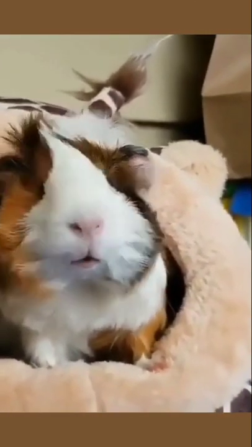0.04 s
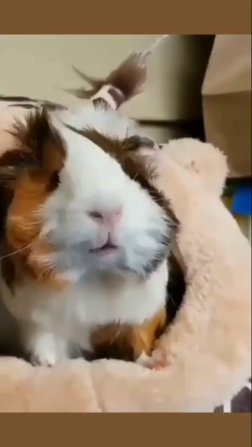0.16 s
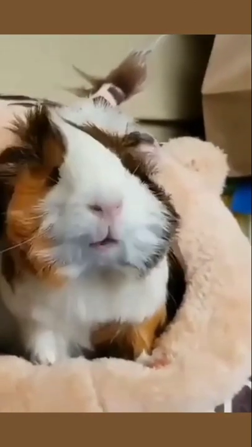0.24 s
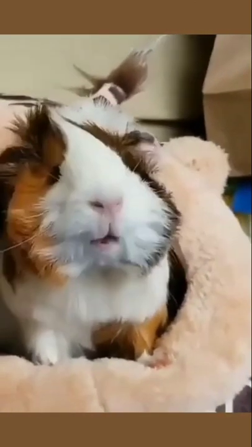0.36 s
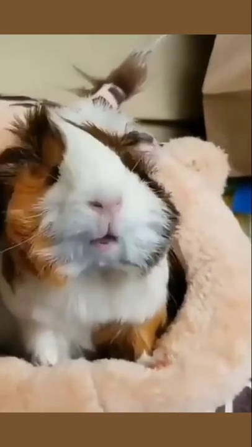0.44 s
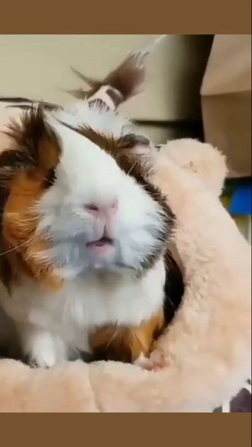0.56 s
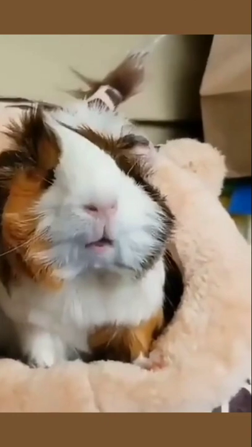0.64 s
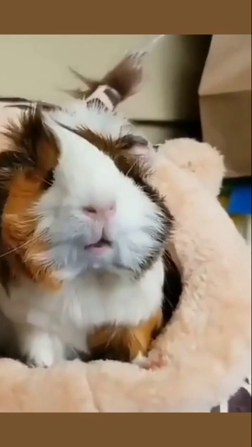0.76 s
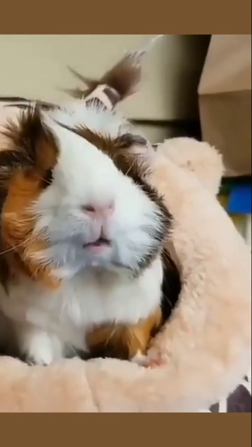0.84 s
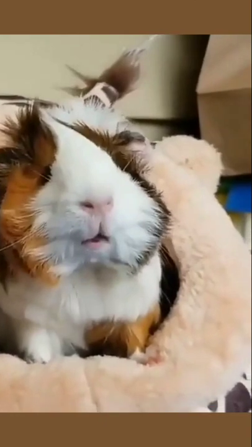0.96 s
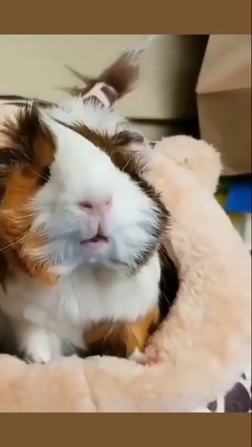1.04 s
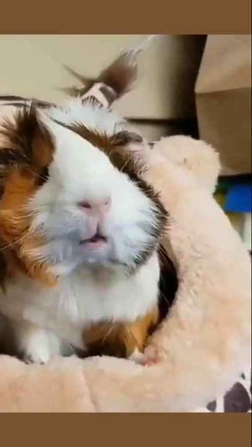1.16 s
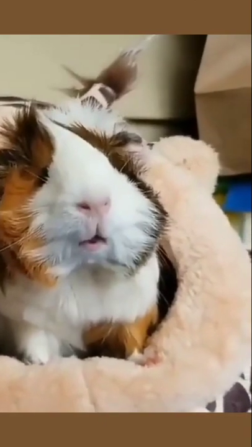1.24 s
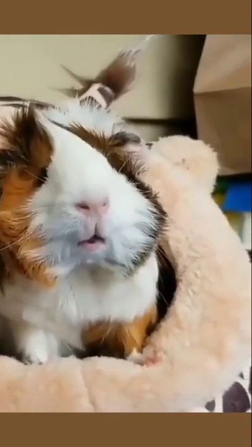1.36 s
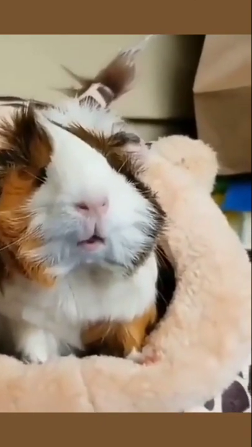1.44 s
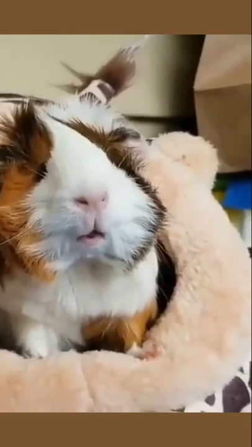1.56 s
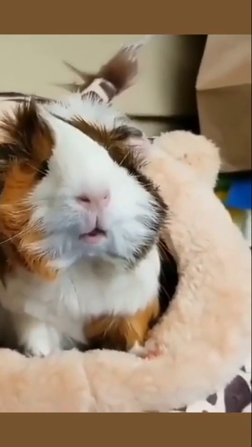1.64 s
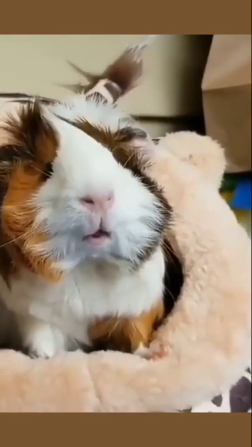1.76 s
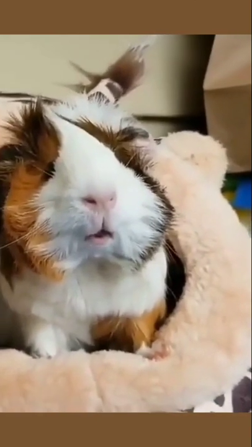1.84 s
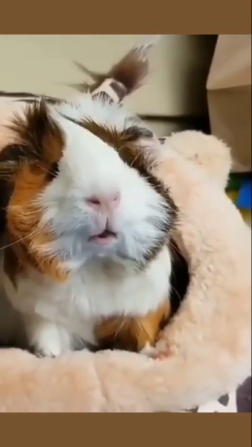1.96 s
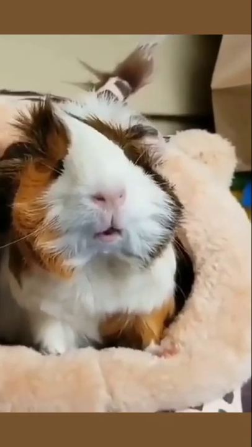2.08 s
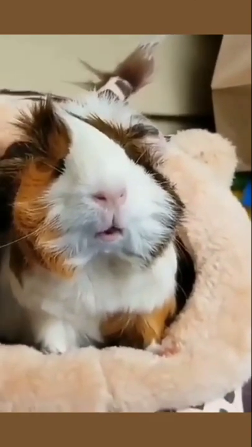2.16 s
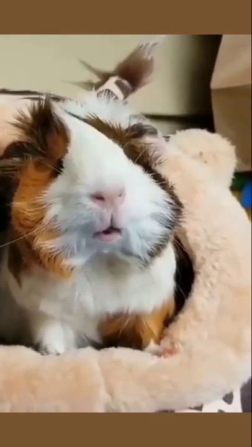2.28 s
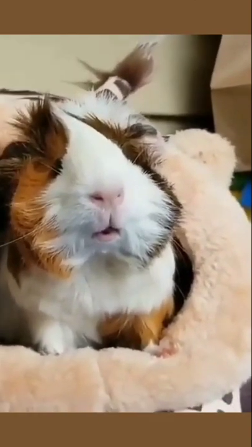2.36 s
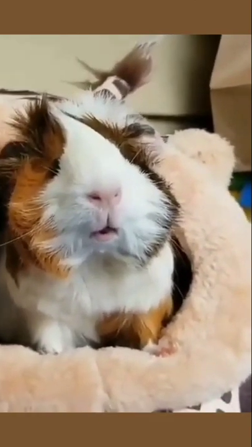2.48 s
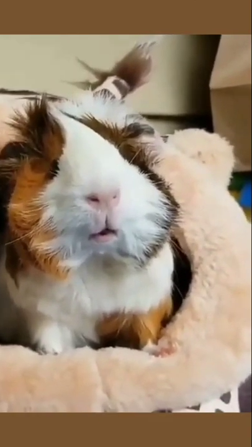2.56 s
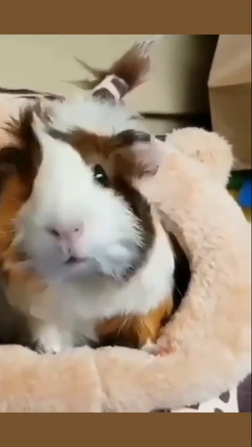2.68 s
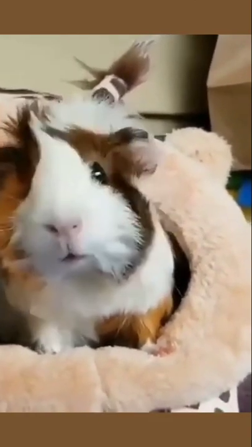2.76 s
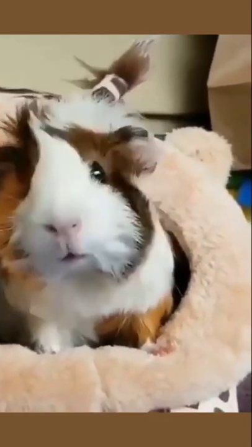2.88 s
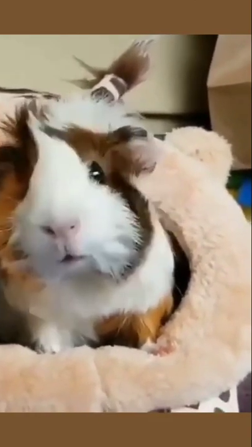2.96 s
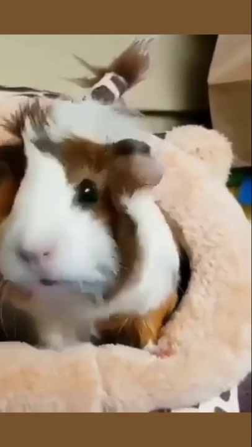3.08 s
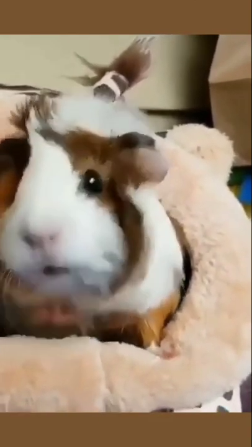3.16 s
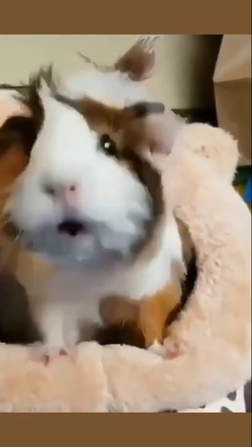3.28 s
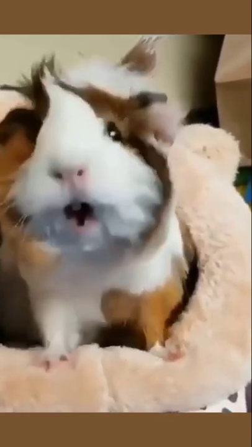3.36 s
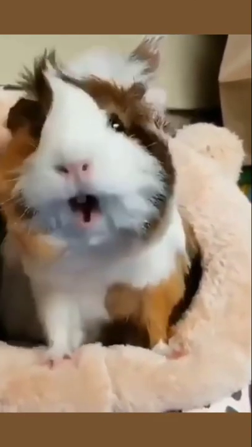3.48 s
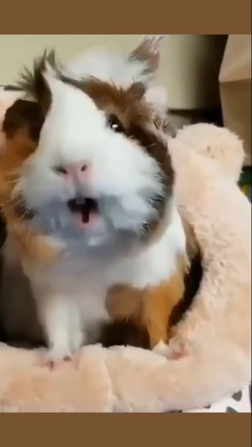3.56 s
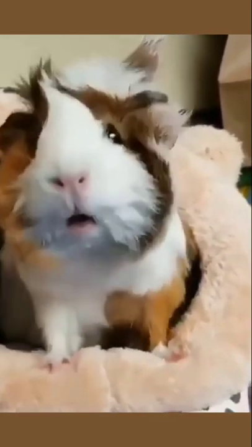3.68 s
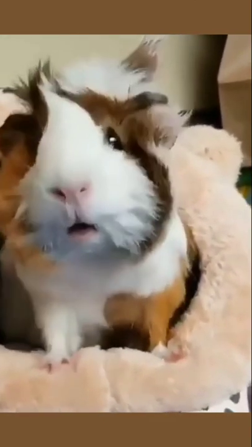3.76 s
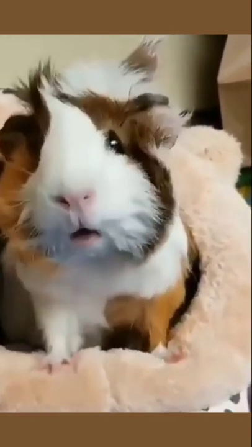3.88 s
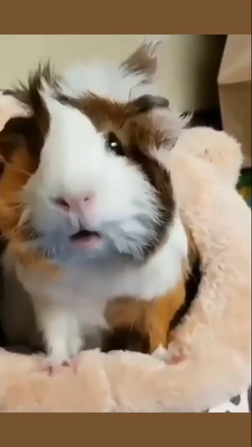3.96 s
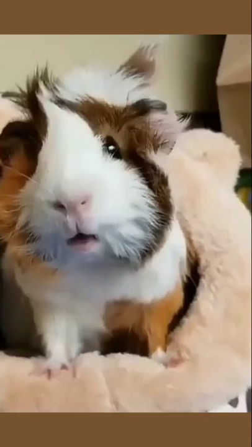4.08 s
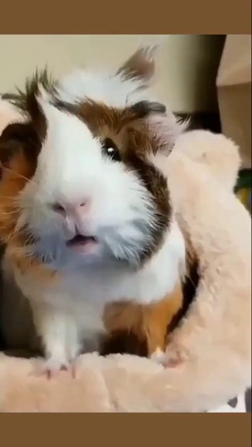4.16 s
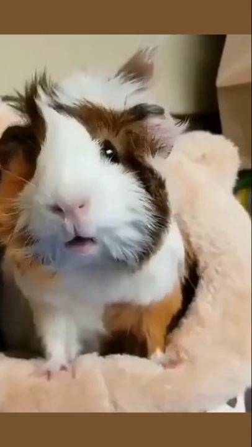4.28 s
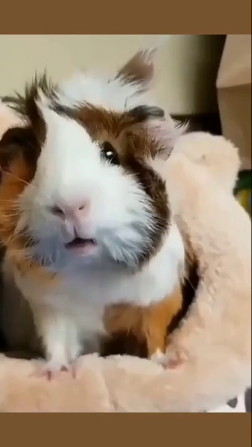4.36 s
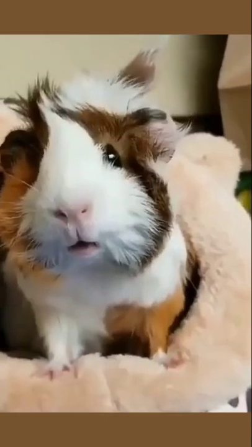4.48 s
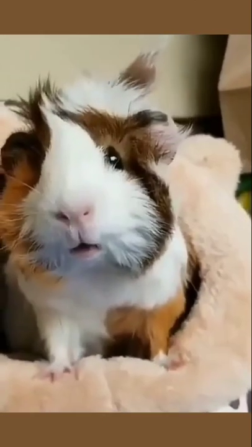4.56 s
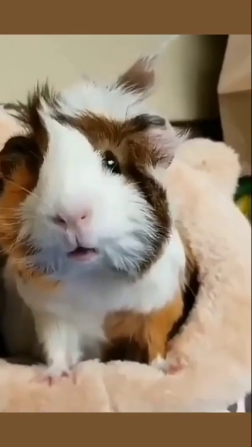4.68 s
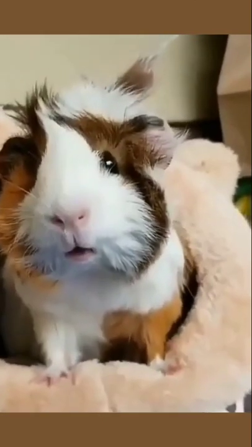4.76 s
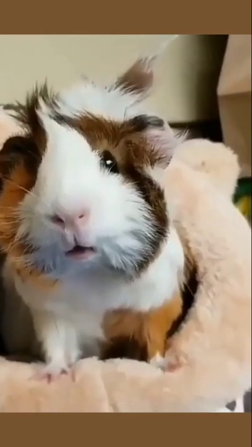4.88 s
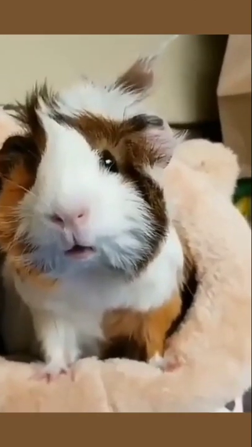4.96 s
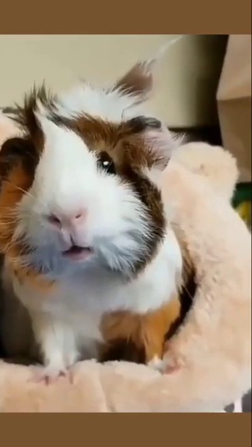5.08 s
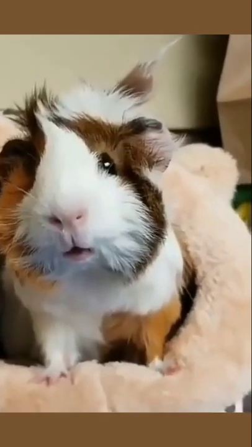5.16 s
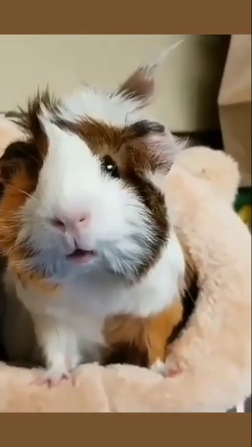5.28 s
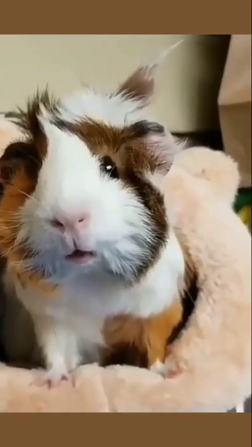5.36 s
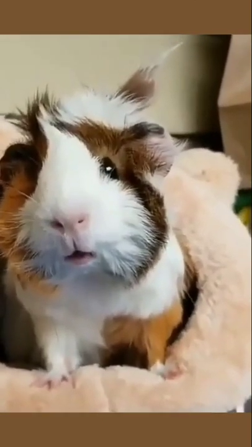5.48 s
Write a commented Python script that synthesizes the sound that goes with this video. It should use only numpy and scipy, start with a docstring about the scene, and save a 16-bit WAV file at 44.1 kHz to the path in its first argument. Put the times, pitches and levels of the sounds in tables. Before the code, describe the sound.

Close phone microphone in a small, fairly dry room. A guinea pig in a fleece bed makes soft, low whimpers that glide up, with tiny peeps and mouth ticks between. Just past the middle one call swells into a piercing, very loud rising whistle; the next stretches into a moderate long squeal. Two quieter whimpers and a soft padded bump end it, over low room noise and faint fur rustle.

```python
"""A small room, a phone microphone close to a fleece bed where a guinea pig calls nine times.
Low room noise and grainy fur rustle, both shaped noise, come first, then ticks of banded noise and short peeps.
Each call is a harmonic stack that starts as a low whimper and glides up; the first breaks into a squeak, the second
whines on, the sixth swells into a piercing whistle, the seventh into a long squeal.
The voice sometimes repeats every second or third cycle; soft bumps, damped low tones, come near the end."""
import sys
import numpy as np
from scipy import signal
from scipy.fft import rfft, irfft
from scipy.io import wavfile
from scipy.ndimage import uniform_filter1d

SR = 44100
rng = np.random.default_rng(int(sys.argv[2]) if len(sys.argv) > 2 else 0)


def transcribe(signal):
    """Save signal, clipped to [-1, 1], as a 16-bit WAV file at the path in sys.argv[1]."""
    frames = np.atleast_2d(signal).T
    limited = np.clip(frames, -1, 1)
    pcm = np.round(limited * 32767).astype(np.int16)
    wavfile.write(sys.argv[1], SR, pcm)


N = 243431
TIME = np.arange(N) / SR


def undb(db):
    """Decibels to gain."""
    return 10 ** (np.asarray(db) / 20)


def unit(x):
    """Scale to rms 1."""
    return x / np.sqrt(np.mean(x ** 2) + 1e-20)


def colour(hz, points):
    """Gain at given frequencies, read from (hz, level_db) points on a log frequency axis."""
    point_hz, level_db = np.transpose(points)
    return undb(np.interp(np.log(hz + 1), np.log(point_hz), level_db))


def noise(points):
    """Steady noise with a given spectrum."""
    size = 2 ** 18
    spectrum = rfft(rng.standard_normal(size)) * colour(np.fft.rfftfreq(size, 1 / SR), points)
    return unit(irfft(spectrum)[:N])


def walk(t, rate):
    """Random wander of spread 1 through a new value rate times a second."""
    place = (t - t[0]) * rate
    return unit(np.interp(place, np.arange(16384), rng.standard_normal(16384)))


def gate(t, start, end, edge):
    """Smooth opening between two times, half open at each of them."""
    opening = np.minimum(t - start, end - t) / edge + .5
    return np.sin(np.pi / 2 * np.clip(opening, 0, 1)) ** 2


# spectrum of the low room noise: hz, level_db
ROOM_SPECTRUM = [(12, -59), (20, -14.5), (119, 0), (386, -8.5), (494, -12), (787, -13.5), (879, -15.5),
                 (1290, -14.5), (1840, -20.5), (4550, -27.5), (7250, -31), (9030, -46.5), (11900, -31),
                 (14000, -42.5)]
# how loud the room noise stands, before its gain: time_s, level_db
ROOM_NOISE_LEVEL = [(0.0, -46), (1.8, -48.5), (2.12, -46), (2.91, -47.5), (3.44, -47), (3.61, -54.5),
                    (4.61, -52.5), (4.98, -49.5), (5.52, -48.5)]


def room_noise(gain_db=1, waver_db=1):
    """A low, slightly wavering background of shaped noise."""
    s, db = np.transpose(ROOM_NOISE_LEVEL)
    level_db = np.interp(TIME, s, db) + gain_db + waver_db * walk(TIME, 19)
    return noise(ROOM_SPECTRUM) * undb(level_db)


# each shift of the body rubs fur on the bedding, level before the gain: start_s, end_s, level_db
RUBS = [(-.03, .08, -52.5), (0.14, .48, -55), (0.646, .96, -58), (1.058, 1.32, -55.5), (1.628, 1.82, -56.5),
        (1.871, 2.28, -52), (2.306, 2.53, -49.5), (2.608, 3.0, -50), (3.022, 3.97, -58), (4.64, 4.85, -65),
        (4.99, 5.09, -55.5), (5.174, 5.6, -61.5)]
# spectrum of fur on fleece: hz, level_db
RUB_SPECTRUM = [(240, -28), (400, -2.5), (907, -6.5), (977, -12.5), (1070, -7), (1670, -16), (2280, -1),
                (3260, -7), (7060, -6), (8830, -16), (12200, -8.5), (13400, -23), (14000, -50.5)]
RUB_EDGE_S, RUB_TREND_DB = 0.11, -0.5  # fade in and out; change of level from start to end
STILL_DB = -79  # fur at rest, before the gain


def bedding(gain_db=4.0, grain_db=2.0):
    """Hairs slip over fleece: a fine, grainy hiss that rises with each shift of the animal."""
    rubs = np.zeros(N)
    for start, end, db in RUBS:
        progress = np.clip((TIME - start) / (end - start), 0, 1)
        rubs += gate(TIME, start, end, RUB_EDGE_S) * undb(db + RUB_TREND_DB * (progress - .5))
    grain = undb(gain_db + grain_db * walk(TIME, 660))
    return noise(RUB_SPECTRUM) * np.hypot(rubs, undb(STILL_DB)) * grain


# ticks and scuffs of mouth and claws, level before gain and decay:
# start_s, level_db, centre_hz, width_hz, decay_s
TICK_BURSTS = [(0.03, -32.5, 1960, 1820, 0.0025), (0.032, -43.5, 12400, 4000, 0.0053),
               (0.203, -29.5, 6760, 2000, 0.0013), (2.45, -42, 5140, 6060, 0.053),
               (3.213, -36.5, 6300, 2000, 0.0075), (3.213, -41.5, 11200, 3000, 0.0073),
               (3.713, -32.5, 2390, 460, 0.008), (3.715, -28.5, 6070, 890, 0.0058),
               (3.708, -28.5, 12140, 496, 0.012), (3.857, -50.5, 1480, 1800, 0.099),
               (4.216, -45.5, 1260, 398, 0.02), (5.006, -44.5, 5500, 6000, 0.022),
               (5.013, -46, 11860, 2530, 0.019), (5.299, -50, 6220, 702, .015)]


def ticks(gain=1.4):
    """Short, damped bursts of noise, each in its own resonant band."""
    out = np.zeros(N)
    t = TIME[:SR // 4]
    f = np.fft.rfftfreq(len(t), 1 / SR)
    for s, db, hz, width, decay in TICK_BURSTS:
        band = 1 / (1 + (2 * (f - hz) / width) ** 2)
        burst = unit(irfft(rfft(rng.standard_normal(len(t))) * band, len(t)))
        # a narrow resonance takes longer to build up
        burst = burst * undb(db) * np.exp(-t / decay) * (1 - np.exp(-t * width))
        i = int(s * SR)
        out[i:i + len(t)] += gain * burst[:N - i]
    return out


# echoes from surfaces near the bed: delay_s, level_db
NEAR_SURFACES = [(.0021, -26), (.0051, -30), (.0094, -30), (.0147, -32)]


def room(x, t60_s=0.39, tail_db=-27):
    """Near surfaces beat against the glides; soft furnishings leave only a short tail."""
    t = TIME[:SR // 2]
    tail = rng.standard_normal(len(t)) * np.exp(-np.log(1000) * t / t60_s) * (t > .004)
    response = undb(tail_db) * tail / np.linalg.norm(tail)
    for delay, db in NEAR_SURFACES:
        response[int(delay * SR)] += undb(db)
    return x + signal.fftconvolve(x, response)[:N]


ARCH_DB = 3.5  # a peep is this much weaker at its ends than in its middle


def peep(start, end, from_hz, to_hz, *levels_db):
    """A straight glide that swells and fades, as rows of (s, pitch, three harmonic levels)."""
    u = np.linspace(0, 1, 21)
    arch = ARCH_DB * (2 * u - 1) ** 2
    glide = [start + (end - start) * u, from_hz + (to_hz - from_hz) * u]
    return np.column_stack(glide + [db - arch for db in levels_db])


HOLD_S = .02  # length of the low note
SCOOP_HZ, SCOOP_S = 48, .01  # the voice starts this much sharp and settles
ATTACK_DB, ATTACK_S = 4, 0.0043  # the low note starts this much weaker and swells briefly
FADE_S = 0.018  # length of the fade that ends a soft call
LOW_DULL_DB = 3  # the low note has weaker upper harmonics than the top of the glide


def whimper(start, end, glide, low_hz, top_hz, end_hz,
            low_db, low_second_db, first_db, second_db, upper_db, fade_db=0):
    """A low note, an S-shaped glide and a slow drift, as rows of (s, pitch, three harmonic levels)."""
    t = np.arange(start, end, .001)
    top = start + HOLD_S + glide
    rise = np.sin(np.pi / 2 * np.clip((t - start - HOLD_S) / glide, 0, 1)) ** 2
    drift = np.maximum(t - top, 0) / max(end - top, glide / 2)
    scoop = SCOOP_HZ * np.exp((start - t) / SCOOP_S)
    hz = low_hz + scoop + (top_hz - low_hz) * rise + (end_hz - top_hz) * drift
    attack = ATTACK_DB * np.exp((start - t) / ATTACK_S)
    fade = attack + fade_db * np.clip(1 - (end - t) / FADE_S, 0, 1)
    first = low_db + (first_db - low_db) * rise
    second = low_second_db + (second_db - low_second_db) * rise
    upper = upper_db - LOW_DULL_DB * (1 - rise)
    return np.column_stack([t, hz, first - fade, second - fade, upper - fade])


# hoarse stretches: start_s, end_s, roughness (0-1)
HOARSE_STRETCHES = [(0.189, .37, 0.17), (0.511, 0.517, 0.2), (0.724, 0.834, 0.6), (1.473, 1.52, 0.6),
                    (1.654, 1.79, 0.33), (1.959, 1.99, 0.7), (2.457, 2.506, 0.37), (3.308, 3.357, 0.15),
                    (3.457, 3.483, 0.08), (3.532, 3.596, 0.31), (3.697, 3.77, 0.29), (3.855, 3.973, 0.22),
                    (4.463, 4.514, 0.33), (5.09, 5.23, 0.23)]
# period doubling or tripling, which puts lines between the harmonics:
# start_s, end_s, level_db, centre_hz, width_octaves, cycles_per_repeat
PERIOD_REPEATS = [(0.212, 0.265, -38, 790, 0.24, 3), (.3, 0.38, -53.5, 850, 0.46, 2),
                  (0.222, .285, -49.5, 3540, .15, 3), (0.952, 1.258, -50, 620, 0.25, 2),
                  (1.71, 1.777, -55, 600, .6, 2), (2.438, 2.49, -48.5, 500, .6, 2),
                  (4.302, 4.459, -51.5, 2760, 0.65, 2), (4.305, 4.441, -46.5, 6400, 0.099, 2)]


def call(rows, mouth, jitter, quaver, shimmer_db, slope_db, air_db, fray, rasp=0.11):
    """One glide of the vocal folds: a harmonic stack coloured by the throat, at times hoarse or period-doubled.

    quaver, jitter and rasp are shares of the pitch; fray is the third harmonic's phase scatter in radians.
    """
    s, *columns = np.transpose(rows)
    live = (TIME > s.min() - .01) & (TIME < s.max() + .01)
    t = TIME[live]
    hz, first_db, second_db, upper_db = (np.interp(t, s, c) for c in columns)
    rough = sum(r * gate(t, a, b, 0.013) for a, b, r in HOARSE_STRETCHES)

    # the folds never hold a pitch exactly, least of all when hoarse
    tremor = quaver * walk(t, 129.3)
    unsteady = (jitter + rasp * rough) * walk(t, 1100)
    hz = uniform_filter1d(hz, size=300) * (1 + tremor + unsteady)
    phase = 2 * np.pi * np.cumsum(hz) / SR

    k = np.arange(3, 12)[:, None]  # upper harmonic numbers
    weight = colour(k * hz, mouth) * undb(slope_db * (k - 3)) * (k * hz < SR / 2)
    # uneven closure of the folds frays the high harmonics most
    blur = fray * k / 3 * np.array([walk(t, 700) for _ in k])
    upper = (weight * np.sin(k * phase + blur)).sum(0) / np.sqrt((weight ** 2).sum(0))
    voice = undb(first_db) * np.sin(phase)
    voice = voice + undb(second_db) * np.sin(2 * phase)
    voice = voice + undb(upper_db) * upper

    # the folds repeat only every second or third cycle, so fractions of the pitch appear
    for start, end, db, centre_hz, octaves, cycles in PERIOD_REPEATS:
        if t[0] < (start + end) / 2 < t[-1]:
            cycles = round(cycles)
            between = np.array([[m / cycles] for m in range(16) if m % cycles])
            shape = np.exp(-(np.log2(between * hz / centre_hz) / octaves) ** 2)
            lines = (shape * np.sin(between * phase)).sum(0)
            voice = voice + undb(db) * gate(t, start, end, 0.03) * lines

    # air escapes once a cycle, more when the voice is pressed
    hiss = signal.lfilter([1], [1, -.5], rng.standard_normal(len(t)))
    air = hiss * (1 + np.cos(phase)) / 2
    voice = voice + undb(air_db) * (undb(second_db) + undb(upper_db)) * air

    flutter = undb(shimmer_db * walk(t, 140)) * (1 + rough * walk(t, 450))
    out = np.zeros(N)
    # the root of two makes a sine's level its rms
    out[live] = np.sqrt(2) * voice * flutter * gate(t, s[0], s[-1], .008)
    return out


# short peeps between the calls, or where the voice breaks upward after a whimper:
# start_s, end_s, start_hz, end_hz, fundamental_db, second_harmonic_db, upper_harmonics_db
SHORT_PEEPS = [(0.088, 0.118, 604, 620, -51.5, -72, -73), (.38, 0.433, 1770, 1890, -53, -51, -73),
               (0.645, 0.676, 575, 616, -48, -68, -73), (0.731, 0.832, 609, 1085, -53, -68, -77),
               (1.308, 1.394, 1800, 1606, -46, -69, -52), (1.476, 1.516, 1070, 1510, -51, -56, -75),
               (1.723, 1.788, 1139, 1213, -43, -57, -56), (1.767, 1.803, 1410, 1620, -47, -56, -53),
               (1.948, 1.987, 983, 1115, -49, -61, -74), (2.824, 2.88, 1302, 1403, -47, -45.5, -63),
               (4.763, 4.829, 1184, 1194, -34, -53.5, -57), (4.813, 4.852, 1298, 1406, -48, -54, -60)]
# the whimper that opens each call; second_db is the second harmonic, upper_db the harmonics above it:
# start_s, end_s, glide_s, low_hz, top_hz, end_hz, low_fundamental_db, low_second_db,
# top_fundamental_db, top_second_db, upper_db
NINE_WHIMPERS = [(.138, .385, .072, 593, 1080, 1840, -37.5, -57, -42.5, -47, -57.5),
                 (.902, 1.01, 0.084, 650, 1247, 1297, -35, -59, -39.5, -51, -57),
                 (1.581, 1.705, 0.1, 646, 1220, 1210, -36.5, -58, -43.5, -61, -54.5),
                 (2.32, 2.505, .085, 599.7, 997, 950, -39, -55, -44, -52, -58),
                 (2.726, 2.835, .06, 583, 953, 1040, -38.5, -54, -39, -61, -46),
                 (3.037, 3.2, .07, 605.4, 996, 1170, -38, -67, -38, -48.5, -49.5),
                 (3.856, 3.975, .105, 605.4, 1225, 1260, -39.5, -45.5, -42.5, -45, -55.5),
                 (4.626, 4.768, 0.092, 636, 1149, 1180, -38.5, -54.5, -42.5, -56.5, -57),
                 (5.044, 5.228, 0.065, 679, 975, 1130, -38, -61, -40, -56.5, -60)]
# how the first, second, sixth and seventh calls go on:
# time_s, pitch_hz, fundamental_db, second_harmonic_db, upper_harmonics_db
SQUEAK_PATH = [(.432, 2200, -40.5, -57, -68), (.46, 2194, -37, -51, -69), (.485, 2250, -31.5, -49, -68),
               (.503, 2280, -29, -49, -64), (.51, 2070, -30, -52, -57), (.524, 2275, -28.5, -45, -65),
               (.556, 2350, -47, -58, -57)]
WHINE_PATH = [(1.02, 1304, -43, -43, -61), (1.066, 1390, -51.5, -54, -62), (1.139, 1289, -46, -49, -65),
              (1.224, 1310, -47, -46, -59), (1.3, 1410, -57, -51, -71)]
WHISTLE_PATH = [(3.22, 1303, -37, -33, -49.5), (3.246, 1590, -55, -42.5, -52.5),
                (3.296, 1790, -29.5, -27, -31), (3.329, 1886, -21, -30, -22),
                (3.365, 2048, -14, -33.5, -27.5), (3.408, 2228, -6, -28, -28),
                (3.439, 2353, -7.5, -22.5, -27), (3.461, 2550, -7, -16, -28), (3.502, 2968, -22, -7.5, -26),
                (3.523, 2994, -24, -9.5, -27), (3.539, 3087, -31.5, -12.5, -25.5),
                (3.576, 3600, -25.5, -25, -43.5), (3.606, 3660, -25, -31.5, -50.5),
                (3.627, 3756, -35.5, -16.5, -55), (3.723, 3897, -34, -29.5, -50),
                (3.764, 3800, -59, -50, -96)]
SQUEAL_PATH = [(3.989, 1342, -39.5, -41.5, -42.5), (4.058, 1394, -42, -42, -48),
               (4.131, 1602, -39.5, -51, -38.5), (4.18, 1650, -37, -51, -35.5),
               (4.22, 1723, -32, -50, -42.5), (4.281, 1779, -31, -52.5, -44.5),
               (4.425, 1799, -32, -54, -46), (4.447, 1842, -35.5, -54, -48), (4.468, 2033, -38, -67, -50.5),
               (4.496, 1940, -51, -68, -73)]
# colour of the upper harmonics with the mouth nearly shut: hz, level_db
SHUT_COLOUR = [(1800, -1), (2600, 7), (3500, -4), (4100, -4), (4750, 18), (5500, -26), (7000, -18),
               (9000, -27), (13000, -22)]
# the same with the mouth open: hz, level_db
OPEN_COLOUR = [(1800, 11.5), (3000, 18.5), (4000, -7), (5200, 2.5), (6700, 7), (7600, -1.5), (8300, -12),
               (9400, -4), (10400, -17), (12000, -4.5), (12900, 6), (13800, -20.5)]


def guinea_pig():
    """Seven soft calls and short peeps with the mouth nearly shut; the sixth and seventh whimpers open into loud calls."""
    first, second, third, fourth, fifth, sixth, seventh, eighth, ninth = NINE_WHIMPERS
    soft = [peep(*row) for row in SHORT_PEEPS]
    # a soft call dies away at its end
    soft += [whimper(*row, fade_db=7) for row in (first, third, fourth, fifth, eighth, ninth)]
    soft += [SQUEAK_PATH, np.vstack([whimper(*second), WHINE_PATH])]
    shut = sum(call(rows, SHUT_COLOUR, jitter=0.018, quaver=0.0095, shimmer_db=2.22,
                    slope_db=-3, air_db=-30, fray=0.26) for rows in soft)
    whistle = call(np.vstack([whimper(*sixth), WHISTLE_PATH]), OPEN_COLOUR, jitter=0.0045, quaver=0.0023,
                   shimmer_db=1.22, slope_db=-4.0, air_db=-37, fray=.3, rasp=0.028)
    squeal = call(np.vstack([whimper(*seventh), SQUEAL_PATH]), OPEN_COLOUR, jitter=0.0024, quaver=.0075,
                  shimmer_db=1.8, slope_db=-0.96, air_db=-41, fray=0.12)
    return shut + whistle + squeal


# the body bumps the padded bed: start_s, level_db, pitch_hz, time_to_peak_s
BED_BUMPS = [(4.775, -44, 162.3, 0.02), (4.999, -31.5, 169, 0.016), (5.003, -37, 244, 0.014),
             (5.008, -40, 337, 0.011)]


def bumps():
    """The padding spreads each blow, so a low mode swells and dies within a few cycles."""
    out = np.zeros(N)
    for s, db, hz, peak in BED_BUMPS:
        t = np.maximum(TIME - s, 0)
        swell = t / peak * np.exp(1 - t / peak)
        out += undb(db) * swell * np.sin(2 * np.pi * hz * t)
    return out


def scene():
    """The animal in its bed, heard close by in the small room."""
    background = room_noise() + bedding()
    return (background + room(ticks() + guinea_pig()) + bumps())[None]


CEILING, TOP_HZ = .88, 13700  # clipping level as a share of full scale; upper edge of the passband


def record(dry):
    """The phone clips peaks just under full scale, then cuts the top with a steep low-pass."""
    low_pass = signal.ellip(8, .2, 70, TOP_HZ, fs=SR, output="sos")
    return signal.sosfilt(low_pass, np.clip(dry, -CEILING, CEILING))


dry = scene()
out = record(dry)
transcribe(out)
```